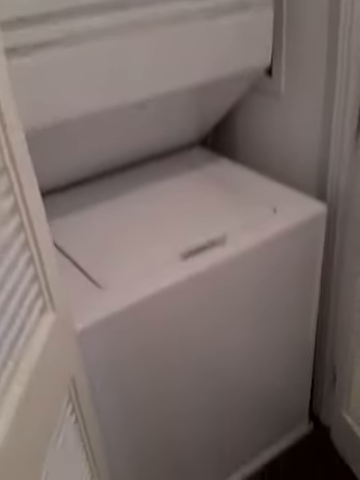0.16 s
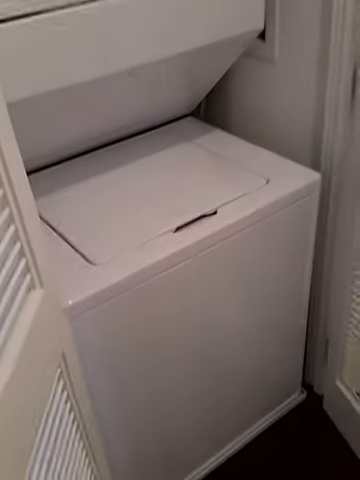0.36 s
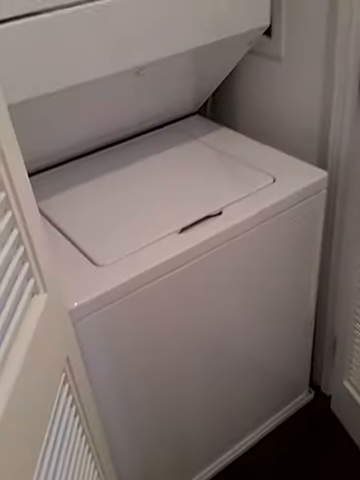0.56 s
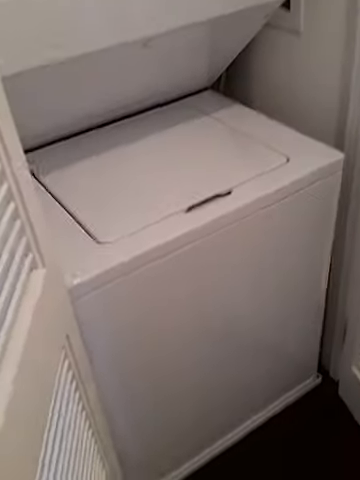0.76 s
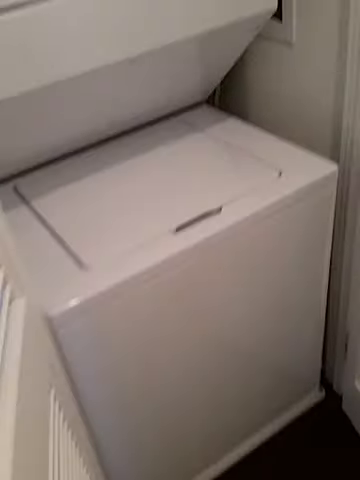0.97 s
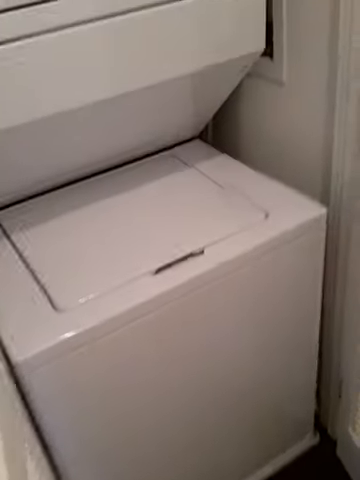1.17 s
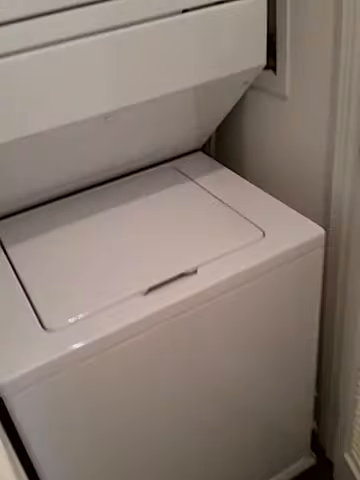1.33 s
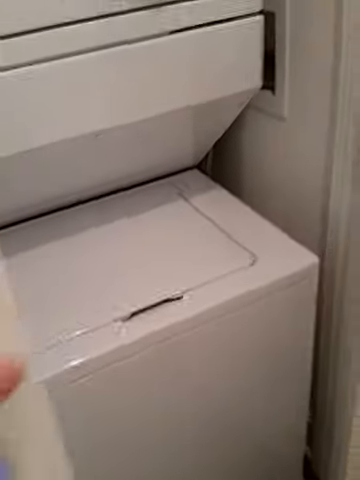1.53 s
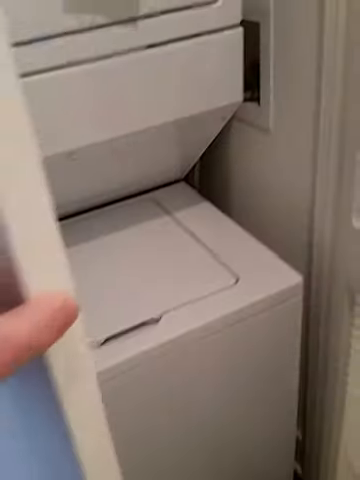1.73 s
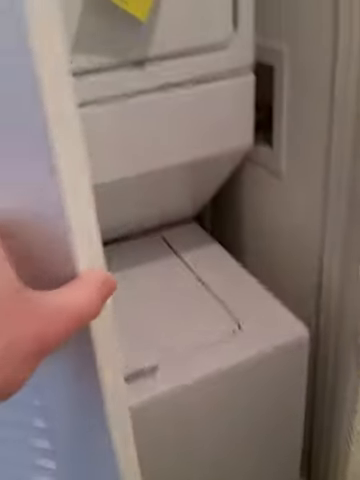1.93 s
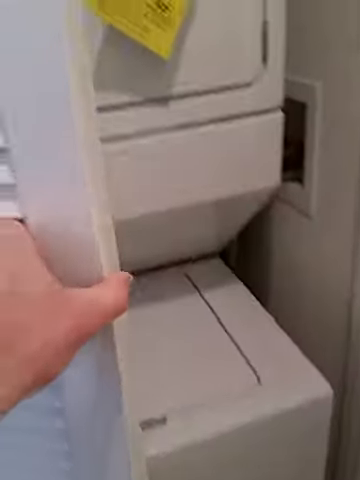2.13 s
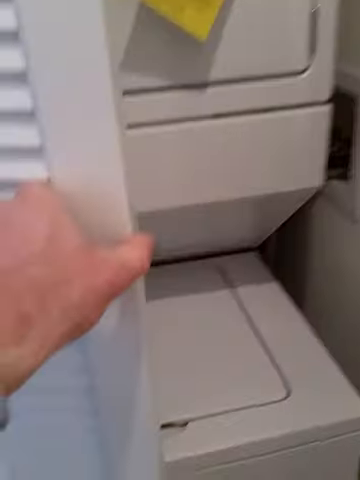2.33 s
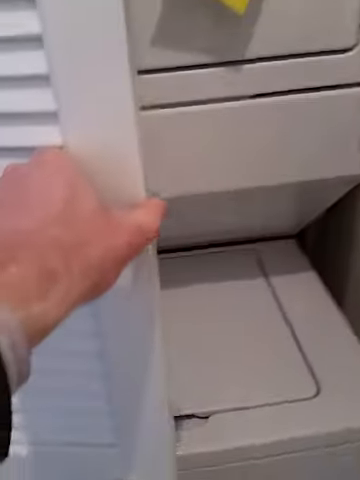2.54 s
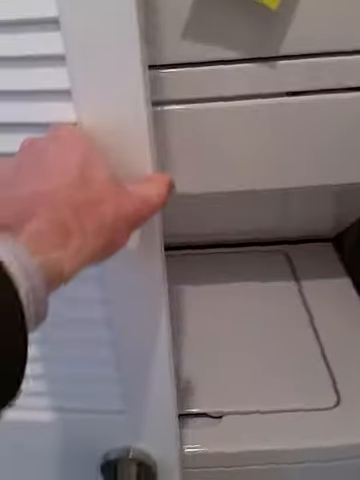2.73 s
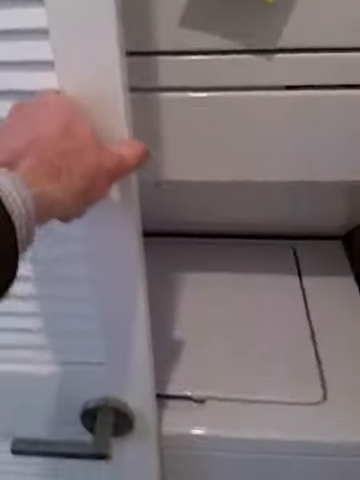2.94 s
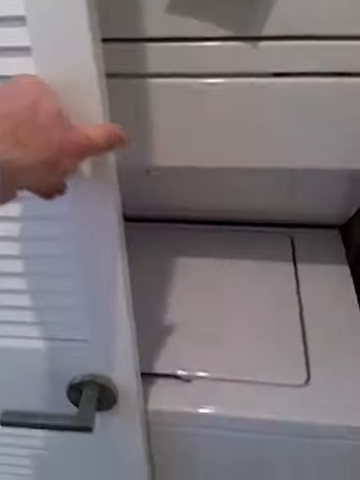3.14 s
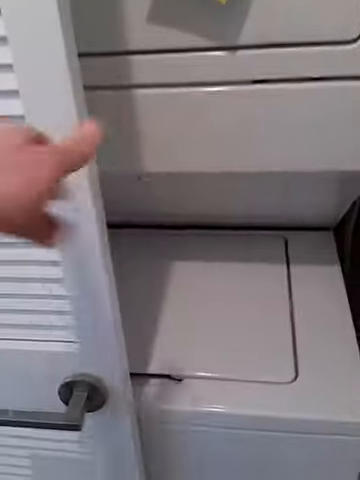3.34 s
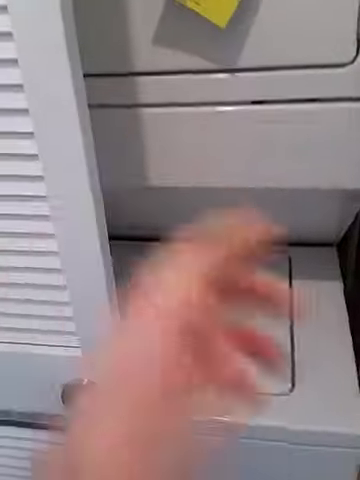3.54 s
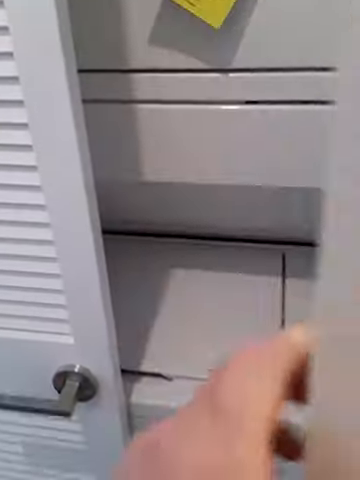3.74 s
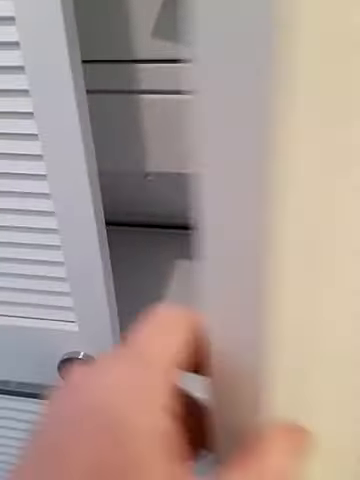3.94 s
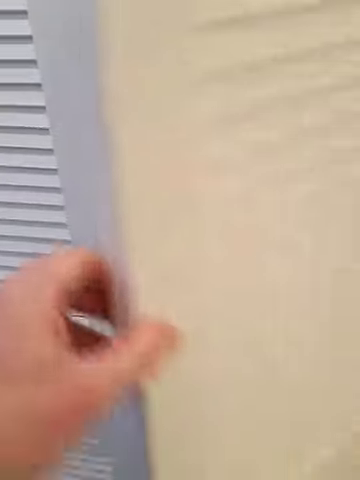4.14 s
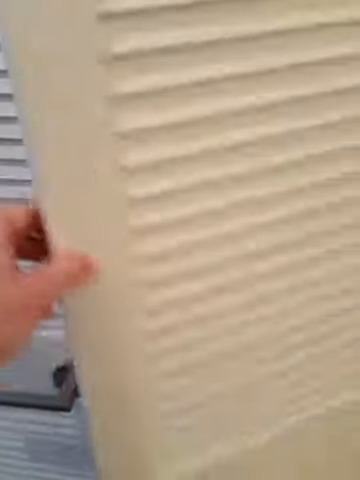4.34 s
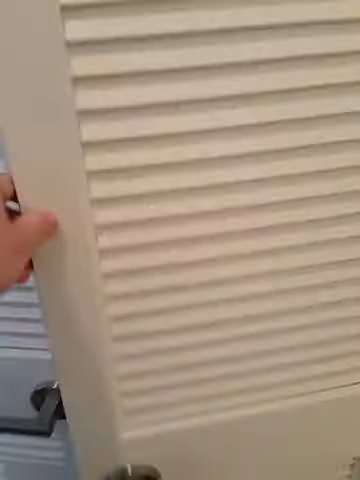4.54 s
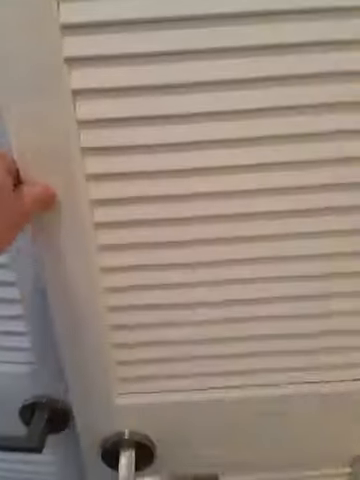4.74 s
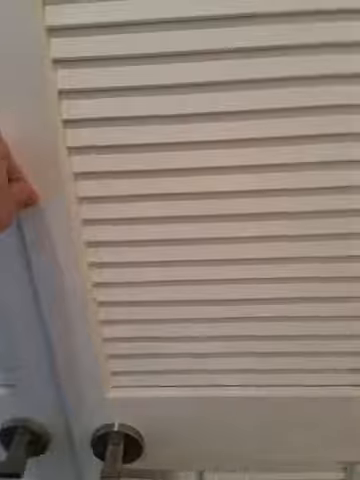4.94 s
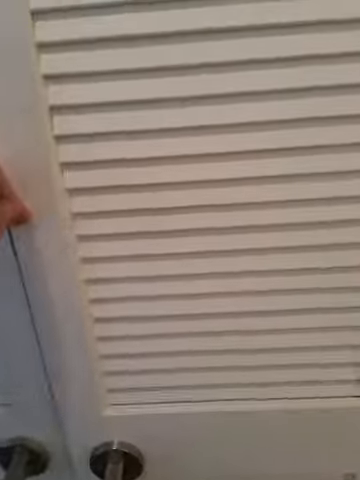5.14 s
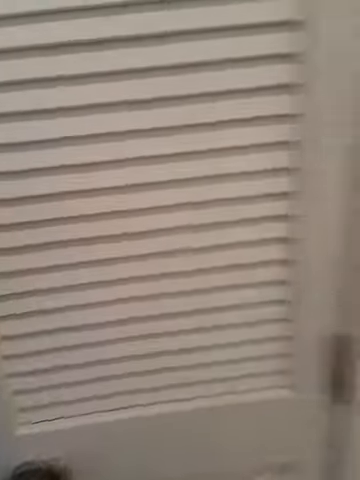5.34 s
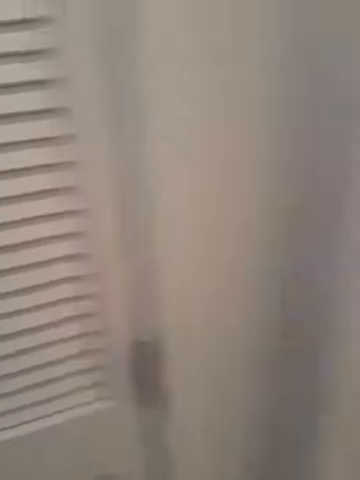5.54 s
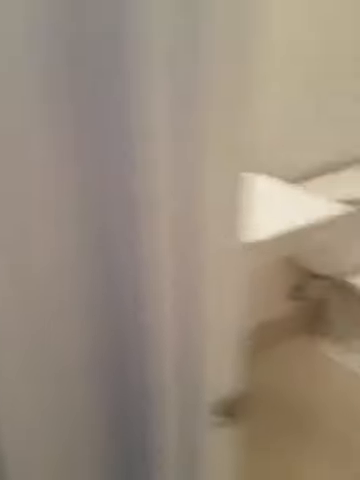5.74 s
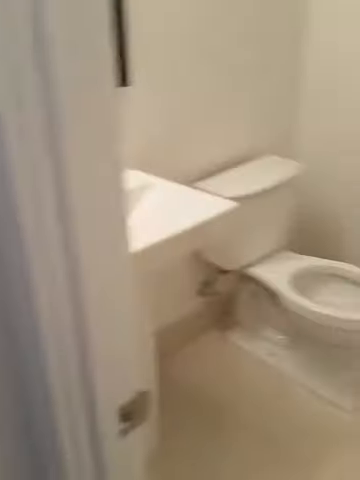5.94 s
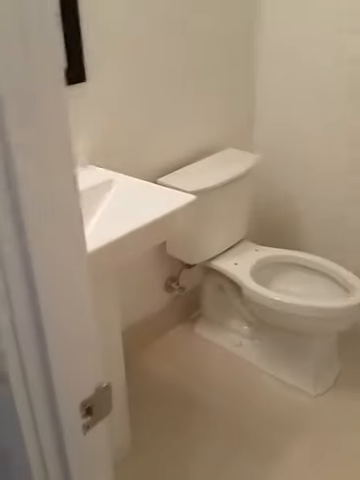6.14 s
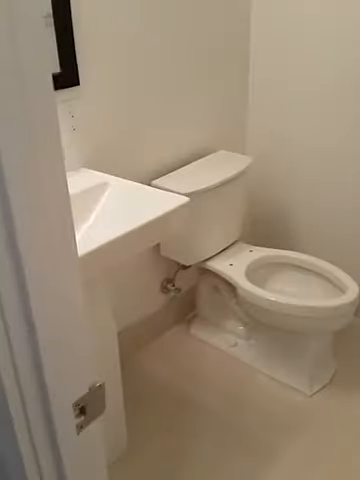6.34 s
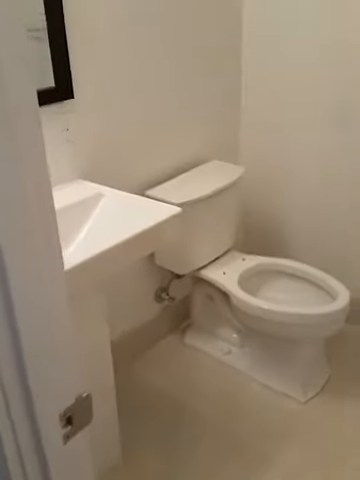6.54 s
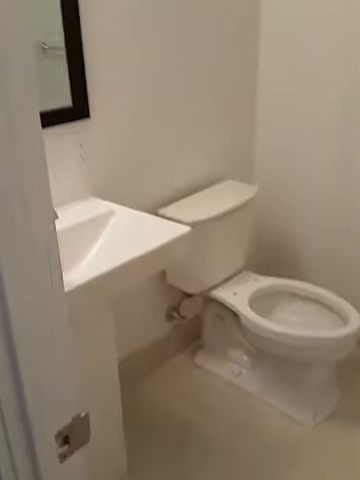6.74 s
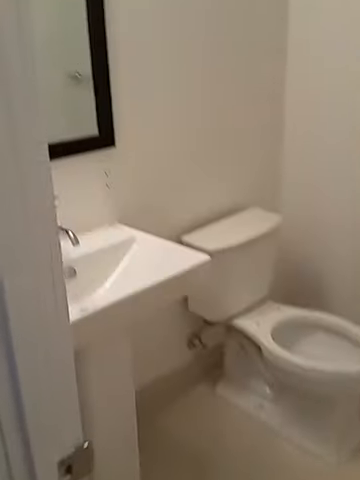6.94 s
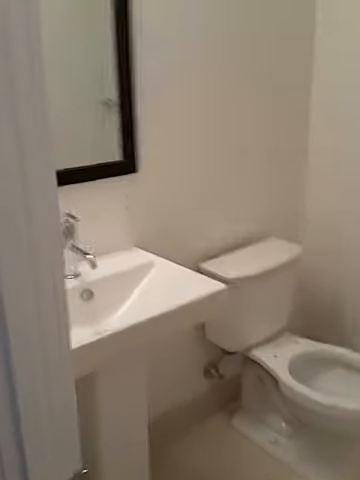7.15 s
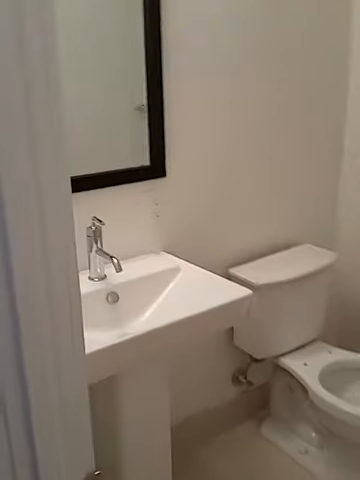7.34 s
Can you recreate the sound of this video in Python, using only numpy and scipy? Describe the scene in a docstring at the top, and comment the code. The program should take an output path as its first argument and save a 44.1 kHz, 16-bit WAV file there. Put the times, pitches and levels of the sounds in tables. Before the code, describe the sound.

Quiet indoor rumble and faint rustling, then a loud wooden door slam at three seconds and a duller knock and thud at five, both ringing.

```python
"""A bare hallway, where two louvered wooden closet doors are pulled round and shut close to two microphone ports.
Each contact is a noise crack, a diffuse ring dying band by band, damped panel modes and a hollow noise boom.
Taps are short noise bands with the same ring; feet and sleeves are fluttering noise with gliding narrow bands.
Air handling is shaped noise with narrow hums over a hiss; moving air puffs on the right port as short pulses."""
import sys
import numpy as np
from scipy import signal
from scipy.fft import rfft, irfft, next_fast_len
from scipy.io import wavfile
from scipy.ndimage import uniform_filter1d, map_coordinates

SR = 44100
rng = np.random.default_rng(int(sys.argv[2]) if len(sys.argv) > 2 else 0)


def dump(signal):
    """Clip the signal to [-1, 1] and save it as 16-bit WAV at the path in sys.argv[1]."""
    limited = np.clip(np.atleast_2d(signal).T, -1, 1)
    pcm = np.round(limited * 32767).astype(np.int16)
    wavfile.write(sys.argv[1], SR, pcm)


N = 330370


def amp(db):
    """Level to amplitude: 20 dB is a factor of ten."""
    return 10 ** (np.asarray(db) / 20)


def unit(x):
    """Normalization to an rms of 1, the square root of the mean power."""
    return x / np.sqrt(np.mean(x ** 2) + 1e-20)


def along(points, hz):
    """Spectral interpolation: (f/Hz, value) points joined by straight lines on a log frequency axis."""
    f, value = np.transpose(points)
    return np.interp(np.log(hz + 1), np.log(f + 1), value)


def wobble(rate, size=N):
    """Slow random fluctuation: a smooth curve through random knots, rate of them per second."""
    knots = rng.standard_normal(int(size * rate / SR) + 4)
    return map_coordinates(knots, [np.arange(size) * rate / SR])


def filtered(x, response):
    """Linear filtering: the spectrum is multiplied by a response of frequency."""
    m = next_fast_len(x.shape[-1] + 8192)
    spectrum = rfft(x, m) * response(np.fft.rfftfreq(m, 1 / SR))
    return irfft(spectrum, m)[..., :x.shape[-1]]


def diffuse(gain, size=N):
    """Diffuse field: stereo noise of rms 1 whose coherence between the ports is high in the bass only."""
    # correlation of the two ports: f/Hz, left-right likeness (-1 to 1)
    likeness = [(60, 0.79), (180, 1), (550, 0.52), (1650, -0.085), (4970, 0.045), (15000, -0.069)]

    def mid_side_gain(hz):
        turn = np.arccos(np.clip(along(likeness, hz), -1, 1)) / 2
        return gain(hz) * [np.cos(turn), np.sin(turn)]

    mid, side = filtered(rng.standard_normal((2, size)), mid_side_gain)
    return unit(np.array([mid + side, mid - side]))


def add(out, s, sound):
    """Superposition: the pressure of a sound starting at s seconds adds to what is there."""
    start = round(s * SR)
    part = out[:, start:start + sound.shape[-1]]
    part += sound[..., :part.shape[-1]]


def air():
    """Slowly varying broadband noise: the building's rumble, with narrow-band hums and microphone hiss."""
    # rumble spectrum: f/Hz, relative level/dB
    rumble_colour = [(12, -51.5), (20, 7), (42, -10), (64, 6.5), (91, -3.5), (115, -2), (186, -10),
                     (224, -7), (254, -9), (385, -11), (942, -22.5), (1020, -22), (1180, -25.5),
                     (2040, -29), (2900, -46), (3770, -84.5), (6380, -120)]
    # rumble level before its waver: t/s, level/dB
    rumble_level = [(0, -39.5), (2.9, -39), (3.7, -42.5), (4.8, -39.5), (5.7, -40), (6.4, -41),
                    (7.49, -40.5)]
    # hums: centre f/Hz, half-width f/Hz to 1/e, level/dB
    hums = [(73, 11, -50.5), (122.9, 7.2, -50), (1196, 23, -67.5), (2060, 21, -74.5)]
    # microphone hiss spectrum: f/Hz, relative level/dB
    hiss_colour = [(1590, -20), (2700, -13.5), (3030, -4), (3650, 0.5), (4370, -4.5), (5990, -15),
                   (7060, -7), (8700, -19), (12700, -9.5), (14200, -4), (15000, -12)]
    waver_db = .6 * wobble(5)
    level = amp(np.interp(np.arange(N) / SR, *np.transpose(rumble_level)) + waver_db)
    rumble = diffuse(lambda hz: amp(along(rumble_colour, hz)) * (hz < 4000))
    hum = sum(amp(db) * diffuse(lambda hz: np.exp(-((hz - centre_hz) / width_hz) ** 2))
              for centre_hz, width_hz, db in hums)
    hiss = amp(-70.0) * diffuse(lambda hz: amp(along(hiss_colour, hz)))
    return level * rumble + hum + hiss


def right_port():
    """Flow noise: air past the right port makes a lumpy low draught and short pressure pulses."""
    # draught spectrum: f/Hz, relative level/dB
    draught_colour = [(15, -29), (40, -4), (90, -2), (180, -14), (400, -40)]
    # draught level: t/s, level/dB
    draught_level = [(0, -41.5), (1.5, -44.5), (2.2, -46), (3.5, -48), (5.499, -44.5), (6.7, -43),
                     (7.2, -42.5), (7.49, -34.5)]
    # puffs: t/s near the middle, level/dB before push and envelope, swing f/Hz,
    # push (sign and factor), half-length to 1/e in cycles
    puffs = [(1.354, -29, 60, -1, 0.97), (2.107, -12.5, 92, 0.7, 0.65), (5.887, -23.5, 112, 1, 0.49),
             (6.079, -23, 119.3, 0.93, 0.8), (6.22, -21.5, 88.7, 0.69, 0.58), (6.952, -24, 112.6, -1, 0.45),
             (7.026, -22, 93, 1, 0.5), (7.246, -8.5, 98.3, 1, 0.58), (7.343, -24, 74, -1.3, 0.64),
             (7.46, -20, 200, -1.12, 0.39)]
    out = np.zeros((2, N))
    lumps = amp(4 * wobble(10))
    level = amp(np.interp(np.arange(N) / SR, *np.transpose(draught_level)))
    draught = diffuse(lambda hz: amp(along(draught_colour, hz)) * (hz < 1000))[1]
    out[1] = level * unit(lumps * draught)
    for s, db, hz, push, length in puffs:
        reach = round(1.5 * SR / hz)
        cycles = np.arange(-reach, reach) * hz / SR
        envelope = np.exp(-(cycles / length) ** 2)
        pulse = -push * amp(db) * np.sin(2 * np.pi * cycles - .3) * envelope
        add(out[1:], s - 1.563 / hz, pulse)
    return out


def patchy(x, depth_db):
    """Irregular friction: the rubbing surfaces change their grip, so bands swell and sink in patches."""
    z = signal.stft(x, nperseg=512)[2]
    field = uniform_filter1d(rng.standard_normal(z.shape[1:]), size=4, axis=0)  # across frequency
    field = uniform_filter1d(field, size=12, axis=1)  # across time
    return unit(signal.istft(z * amp(depth_db * unit(field)), nperseg=512)[1][:, :N])


def stroke(s, rise, hold, fall, db):
    """Exponential growth and decay: the level/dB of one stroke is a straight rise, hold and fall."""
    t = np.arange(N) / SR
    swell_db = 20  # gained over the rise time, lost over the fall time
    outside = np.maximum((s - t) / rise, (t - s - hold) / fall)
    return db - swell_db * np.maximum(0, outside)


def brushing():
    """Friction noise: soles and cloth slide in two fluttering bands; some slides sound a gliding hollow."""
    # slides: t/s at full level, rise t/s, hold t/s, fall t/s, swish level/dB, lower band level/dB re swish
    slides = [(0.72, 0.23, 0.063, .25, -66.5, 1.5), (1.40, 0.13, 0.34, 0.87, -69, 2),
              (1.885, 0.017, 0.076, 0.29, -60.5, -1), (2.173, 0.022, .01, .25, -67, 8),
              (2.39, .07, 0.042, 0.088, -54, -6.5), (2.48, 0.037, 0.25, 0.23, -45.5, -3.5),
              (2.94, 0.073, .05, .03, -65.5, 7.5), (3.35, .15, .01, 0.32, -57, 2),
              (4.24, 0.34, 0.071, 0.36, -54.5, 4), (4.72, 0.085, 0.076, 0.32, -65, 3.5),
              (6.38, 0.29, 0.14, 0.17, -62.5, -4.5)]
    # swish spectrum: f/Hz, relative level/dB
    swish_colour = [(3470, -18), (5900, -9.5), (7200, 0.5), (8030, -4), (9030, -3.5), (14000, -9.5),
                    (14800, -11), (15000, -37)]
    # lower band spectrum: f/Hz, relative level/dB
    body_colour = [(1350, 0), (2300, 1.5), (2710, -0.5), (2950, 0.5), (3480, -1), (4080, 1.5), (6000, -10),
                   (7800, -38), (13200, -120)]
    # gliding hollows: t/s at full level, rise t/s, hold t/s, fall t/s, level/dB,
    # first f/Hz, last f/Hz, half-width f/Hz to 1/e
    scuffs = [(2.475, .02, .04, .15, -52, 4140, 4100, 200),
              (2.501, 0.054, 0.05, .05, -51.5, 1660, 1610, 150),
              (2.586, 0.037, .08, .08, -46.5, 1420, 1123, 220),
              (2.61, 0.055, 0.16, .1, -53.5, 1803, 2290, 280),
              (2.713, 0.063, .04, 0.24, -50.5, 1148, 1108, 300),
              (4.124, 0.15, 0.12, .3, -56, 1880, 1975, 450)]

    def rubbed(colour):
        return patchy(diffuse(lambda hz: amp(along(colour, hz))), depth_db=1.9)

    swish = sum(amp(stroke(*shape)) for *shape, low_db in slides) * rubbed(swish_colour)
    body = sum(amp(stroke(*shape) + low_db) for *shape, low_db in slides) * rubbed(body_colour)
    for s, rise, hold, fall, db, *ends_hz, width_hz in scuffs:
        part = slice(round((s - 1) * SR), round((s + 1) * SR))
        glide_hz = np.interp(np.arange(N)[part] / SR, [s, s + hold], ends_hz)
        phase = 2 * np.pi * np.cumsum(glide_hz) / SR
        # slow noise on a gliding carrier is a narrow band about it
        slow = rng.standard_normal((2, 2, len(phase)))
        slow = unit(filtered(slow, lambda hz: np.exp(-(hz / width_hz) ** 2)))
        hollow = slow[0] * np.cos(phase) + slow[1] * np.sin(phase)
        body[:, part] += amp(stroke(s, rise, hold, fall, db)[part]) * hollow
    flutter = unit(amp(.5 * wobble(30) + .5 * wobble(110)))
    return flutter * (swish + body)


def strike(gain, crack_db, crack_t60, lead_ms, ring_db):
    """Impact and reverberation: direct crack, near walls' answer, then rooms decaying band by band."""
    # reverberation: f/Hz, decay t60/s
    rooms = [(60, 0.32), (250, 1.8), (1000, 1.35), (3000, 1.325), (7000, 0.89), (14000, 0.13)]
    waver_db, waver_per_s = 1, 90  # slow random waver makes the ring uneven
    t = np.arange(SR) / SR

    hz, frames, z = signal.stft(diffuse(gain, size=SR), SR, nperseg=256)
    room_decay = amp(-60 * frames / along(rooms, hz)[:, None])
    early_decay = 1.08 * amp(-60 * frames / 0.31)
    tail = signal.istft(z * (room_decay + early_decay), SR, nperseg=256)[1][:, :SR]
    tail *= 1 - np.exp(-t / 0.0029)
    waver = np.array([wobble(waver_per_s, size=SR), wobble(waver_per_s, size=SR)])
    tail *= amp(ring_db + waver_db * waver)

    def led(f):  # half the lead advances the left port, half delays the right
        return gain(f) * np.exp(1j * np.pi * f * lead_ms / 1000 * np.array([[1], [-1]]))

    direct = unit(filtered(rng.standard_normal(4096), led))
    near_walls = 0.63 * diffuse(gain, size=4096)
    start = t[:4096]
    envelope = amp(crack_db - 60 * start / crack_t60) * (1 - np.exp(-start / 0.0012))
    tail[:, :4096] += envelope * (direct + near_walls)
    return tail


def taps():
    """Band-limited impacts: fingers, hinges and slats knock, each a noise band about its centre."""
    # knocks: t/s, crack level/dB before its envelope, centre f/Hz, width in octaves,
    # broad click level/dB re band, ring level/dB re crack
    knocks = [(1.880, -34.5, 388, 0.66, -18, -5), (2.026, -40, 450, 0.59, -3, -10),
              (2.17, -47.5, 4770, 0.56, -22.5, -15), (2.62, -51.5, 3000, 0.88, -20, 2.5),
              (2.934, -48, 8000, 0.51, -25, -22), (2.987, -61, 7940, 1.2, -25, -24.5),
              (3.245, -40, 7900, 0.3, -18, -21), (3.647, -33, 340, 0.21, -34, -23),
              (3.9152, -34.5, 2530, 0.24, 0, -16), (4.901, -31.5, 1300, 0.96, -20, -23.5)]
    crack_t60_s, left_lead_ms = 0.043, 0.395
    click_db_per_octave = 4.5  # the broad click weakens away from the centre
    out = np.zeros((2, N))
    for s, db, centre_hz, width, click_db, ring_db in knocks:
        def band(hz):
            octaves = np.abs(np.log2((hz + 1) / centre_hz))
            click = amp(click_db - click_db_per_octave * octaves)
            return np.exp(-.5 * (octaves / width) ** 2) + click

        add(out, s, strike(band, db, crack_t60_s, left_lead_ms, db + ring_db))
    return out


def resonant(colour, peaks):
    """Spectral superposition: the power of resonant peaks adds to that of a broad colour."""
    def gain(hz):
        peak_power = sum(amp(2 * db) / (1 + (2 * (hz - centre_hz) / width_hz) ** 4)
                         for centre_hz, width_hz, db in peaks)
        return np.sqrt(amp(2 * along(colour, hz)) + peak_power)

    return gain


def doors():
    """Impact excitation of plates: each contact cracks and rings; the panel bends and booms a little later."""
    # left door shuts, right catch touches and barely moves its panel, right door shuts:
    # t/s, crack level/dB before its envelope, crack t60/s, left port lead t/ms, ring level/dB before decay,
    # boom delay t/s, boom level/dB, hollow level/dB re boom
    contacts = [(3.0034, -2, 0.017, 0.4, -23, 0.00488, -16, -2.5),
                (4.8895, -20, 0.036, -0.18, -35, 0.0029, -57.5, 7.5),
                (5.0198, -9.5, 0.035, .43, -26.5, 0.00707, -12.5, -9)]
    # broad spectra of the contacts: f/Hz, relative level/dB
    left_colour = [(300, -12.5), (500, -6), (1200, -9), (1400, -5), (2550, -3.5), (2850, -15.5),
                   (4300, -19), (5000, -22.5), (6000, -23.5), (8000, -20.5), (12000, -30), (14400, -31)]
    catch_colour = [(250, -8), (450, -13.5), (900, -6), (1940, -9), (3450, -17), (4300, -11.5),
                    (6200, -14.5), (9000, -12), (12000, -20), (14500, -24)]
    right_colour = [(300, -7.5), (500, -9), (700, -23), (1500, -16), (2300, -17.5), (4600, -18),
                    (5900, -21), (8000, -24), (10200, -23), (11400, -30.5), (14000, -18)]
    # resonant peaks of each contact as picked up, microphone colour included, on the same scale:
    # f/Hz, width f/Hz at half power, level/dB
    left_peaks = [(1306, 98, -4.5), (1470, 72, 1), (1750, 320, -1), (2020, 580, -12.5), (2200, 76, -14),
                  (2520, 170, -5), (3290, 350, -11.5), (3750, 87, -13), (6940, 710, -14.5)]
    catch_peaks = [(767, 96, 0), (1249, 510, -0.5), (4750, 280, -7), (5400, 270, -4), (6800, 300, -12.5)]
    right_peaks = [(793, 106, -9), (1155, 240, -2.5), (1760, 440, -7), (2790, 44, -14.5), (3170, 230, -12),
                   (3760, 220, -11.5), (4190, 54, -13), (5190, 100, -14), (5610, 70, -20.5),
                   (6170, 120, -23), (7030, 1260, -13)]
    # modes of the door panels: f/Hz, level/dB re boom, decay t60/s
    left_panel = [(64.1, -8, 0.93), (102, 1, 0.24), (151.4, 0, 0.29), (229, -21, 0.98), (244, 0, 0.13),
                  (297.4, -11.5, 0.23)]
    right_panel = [(63, -3, 0.57), (102, 1, 0.62), (149.5, -28, 0.23), (215.4, -17.5, 1), (233.2, 2, 0.34),
                   (293.5, -16.5, 0.22)]
    # the closet's hollow answer: f/Hz, relative level/dB
    hollow_colour = [(22, -37.5), (38, -12), (70, -2), (110, -6), (200, -9), (300, -7), (400, -18),
                     (520, -28), (800, -37), (1500, -110)]

    out, t = np.zeros((2, N)), np.arange(SR) / SR
    bodies = [(resonant(left_colour, left_peaks), left_panel),
              (resonant(catch_colour, catch_peaks), right_panel),
              (resonant(right_colour, right_peaks), right_panel)]
    for (gain, panel), (s, *crack_and_ring, delay, boom_db, hollow_db) in zip(bodies, contacts):
        add(out, s, strike(gain, *crack_and_ring))
        boom = sum(amp(db - 60 * t / t60) * np.sin(2 * np.pi * hz * t) for hz, db, t60 in panel)
        hollow = amp(hollow_db) * diffuse(lambda hz: amp(along(hollow_colour, hz)), size=SR)
        hollow *= amp(-60 * t / 0.62) + amp(-5.5 - 60 * t / 1.04)  # double-slope decay
        onset = 1 - np.exp(-t / 0.0018)
        add(out, s + delay, amp(boom_db) * (boom + hollow) * onset)
    return out


def scene():
    """Superposition of everything that reaches the two ports."""
    return air() + right_port() + brushing() + taps() + doors()


def record(dry):
    """Transducer response: the two ports colour sound differently and pass a limited band."""
    # port mismatch: f/Hz, level/dB of left minus right
    mismatch = [(60, -3), (99, 1.5), (160, -2.5), (270, 0), (450, -1.5), (740, 2), (1220, -1), (2010, 1),
                (3330, 0.5), (5500, -2), (9080, 0), (15000, -3.5)]
    top_hz = 15600  # nothing passes above

    def response(hz):
        tilt = amp(along(mismatch, hz) / 2 * np.array([[1], [-1]]))
        treble_roll = amp(-25 * np.clip((hz - 14500) / 300, 0, 1))
        bass_roll = hz ** 2 / (hz ** 2 + 26 ** 2)
        return tilt * treble_roll * bass_roll * (hz < top_hz)

    return filtered(dry, response)


dry = scene()
out = record(dry)
dump(out)
```